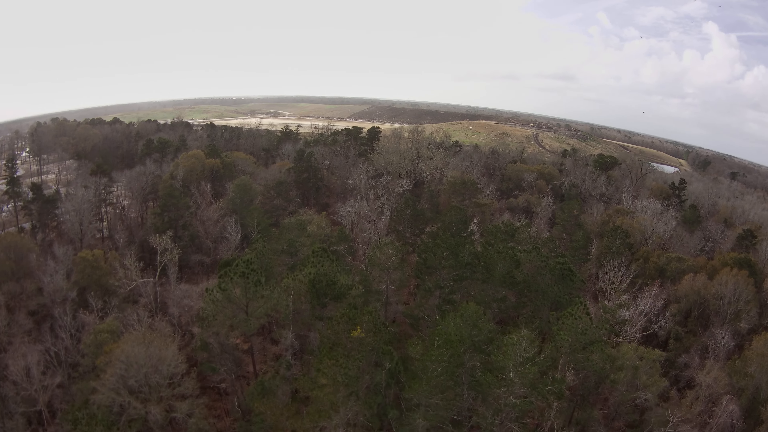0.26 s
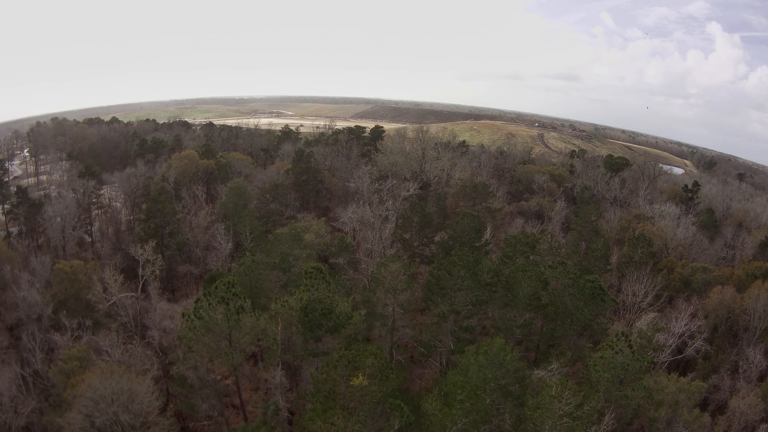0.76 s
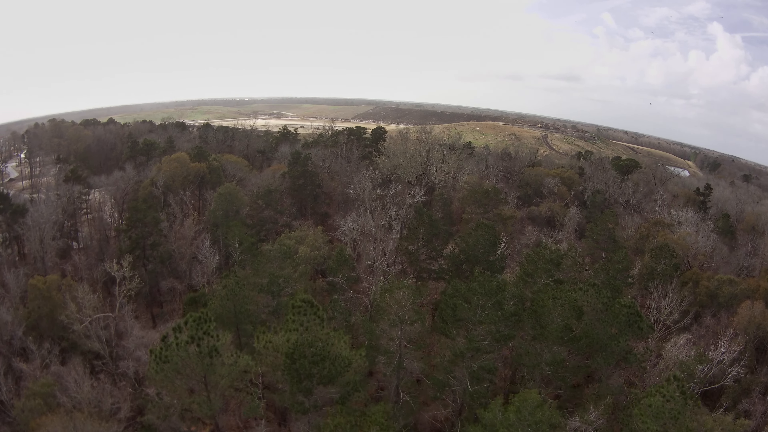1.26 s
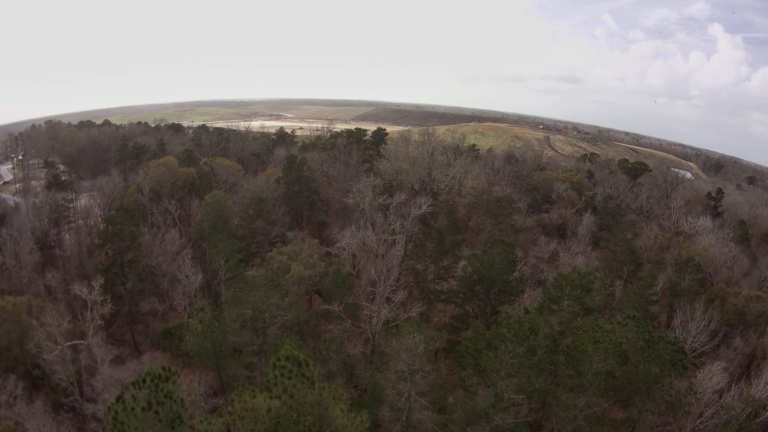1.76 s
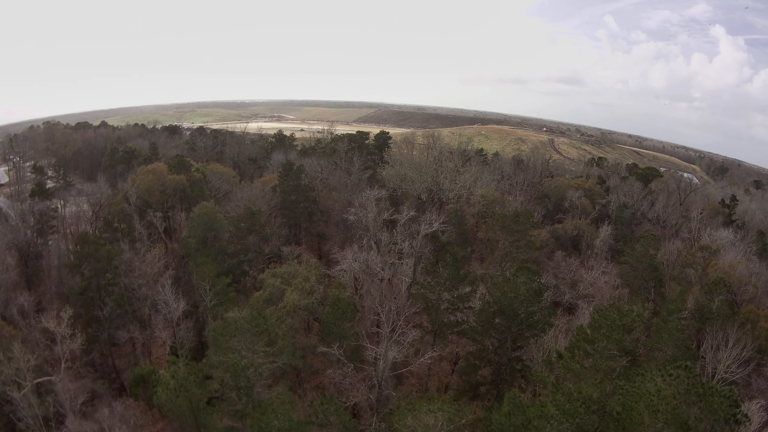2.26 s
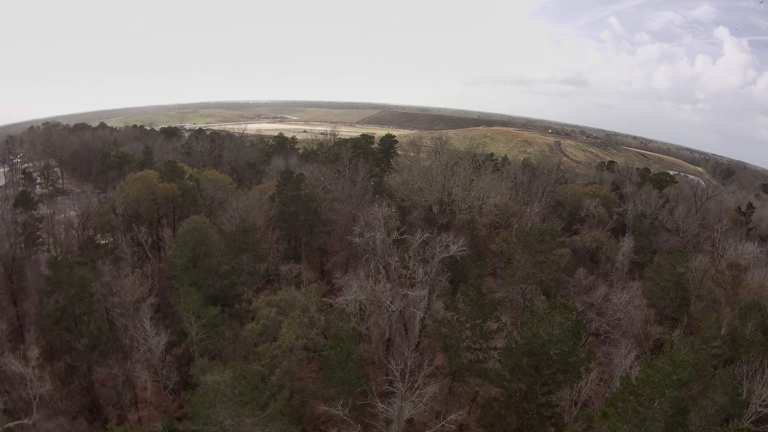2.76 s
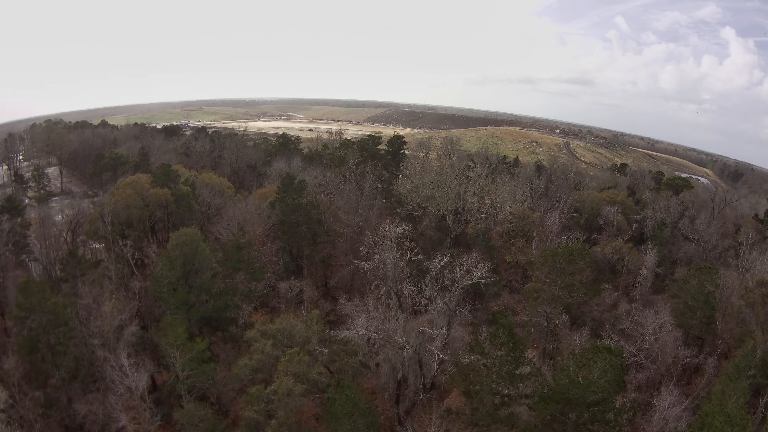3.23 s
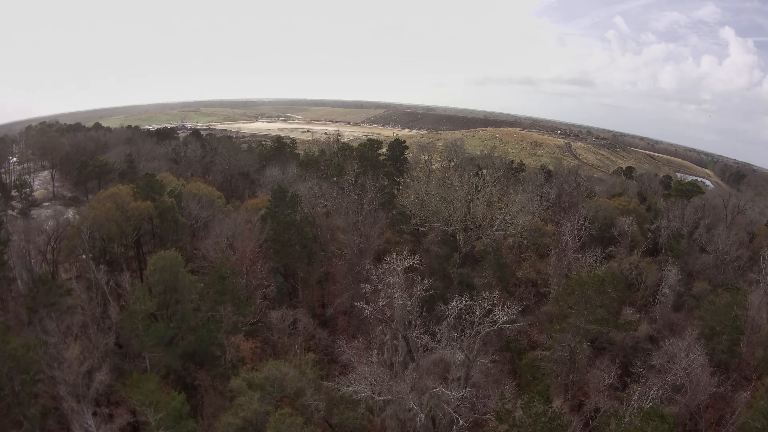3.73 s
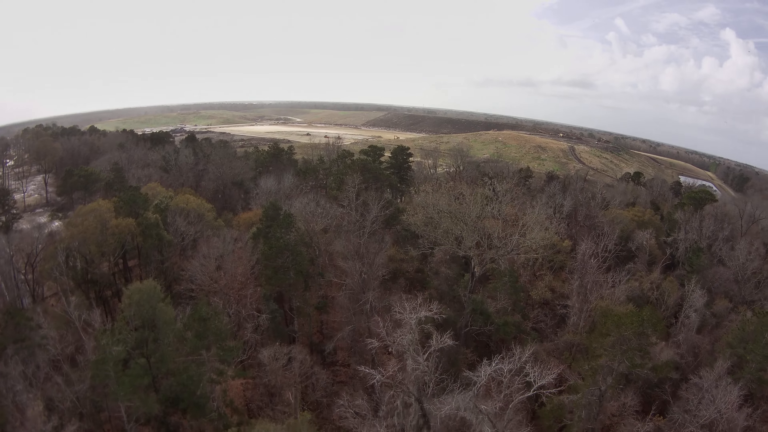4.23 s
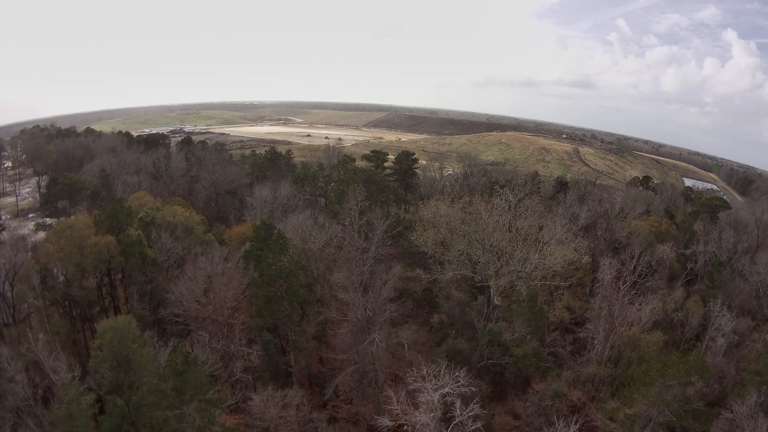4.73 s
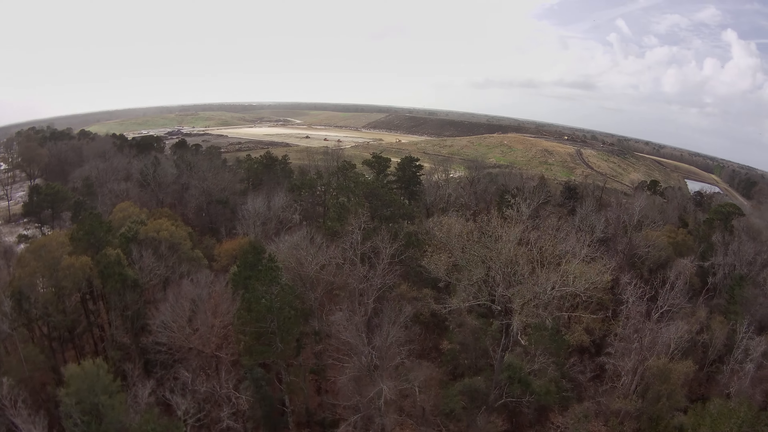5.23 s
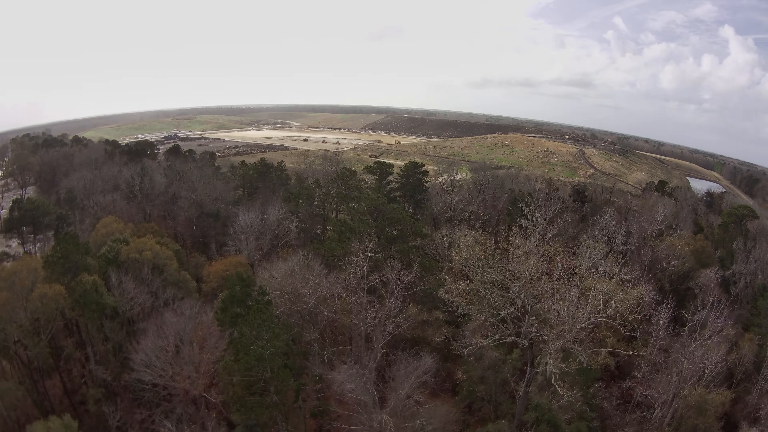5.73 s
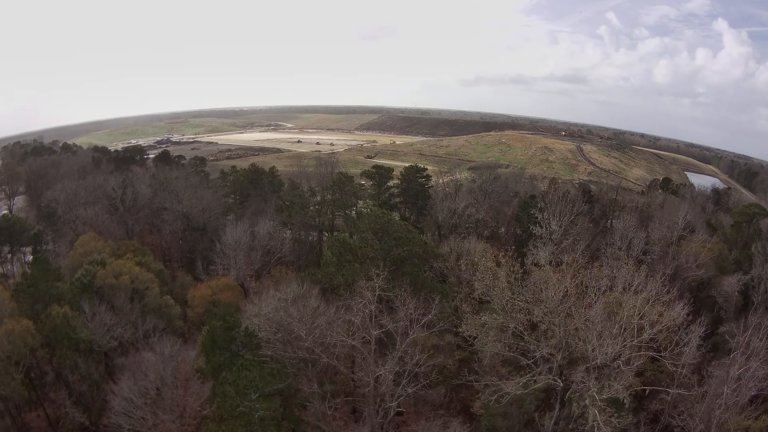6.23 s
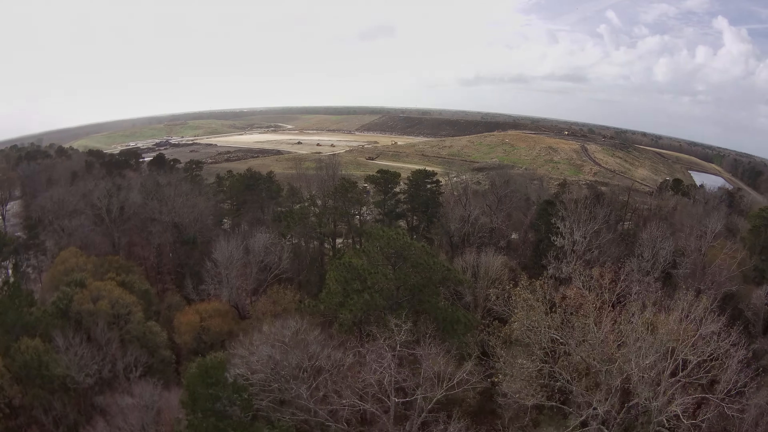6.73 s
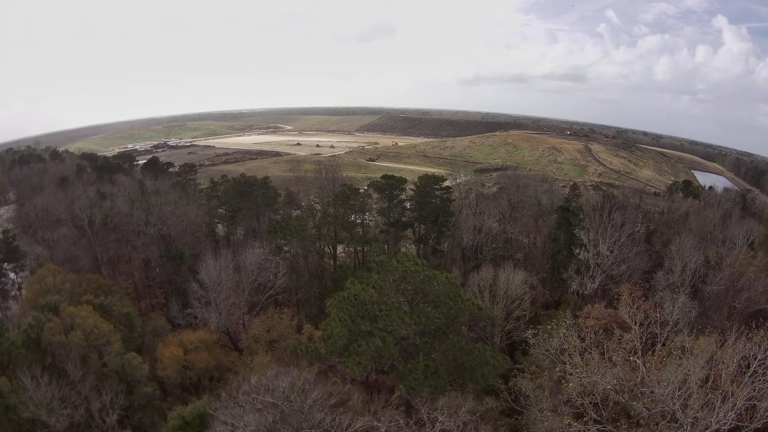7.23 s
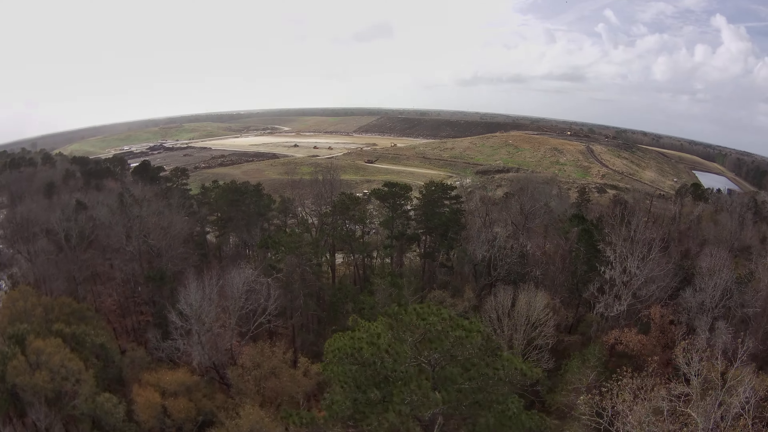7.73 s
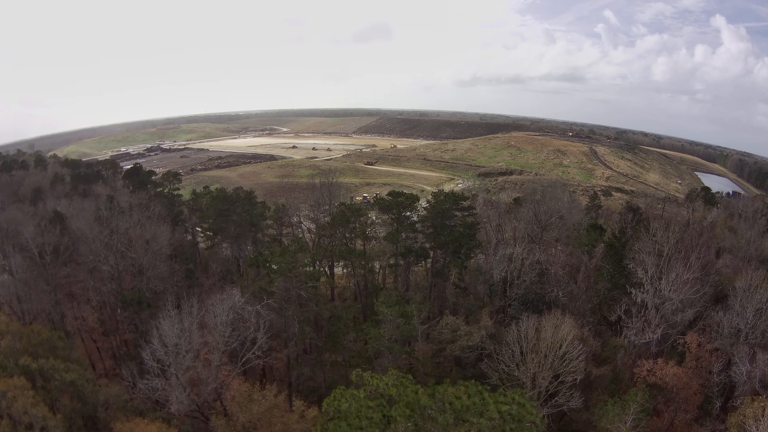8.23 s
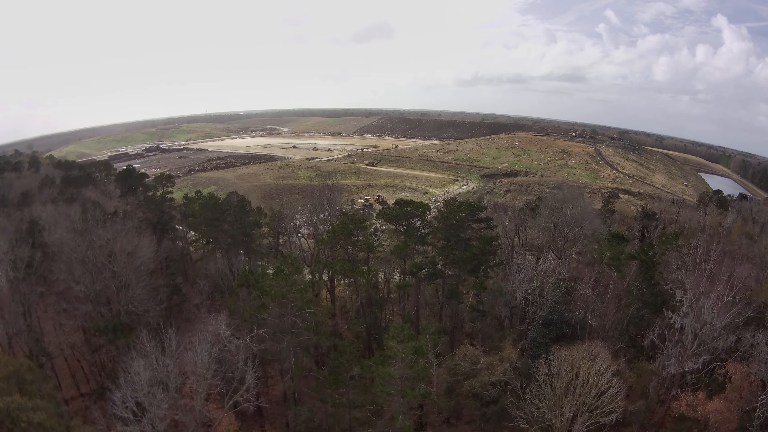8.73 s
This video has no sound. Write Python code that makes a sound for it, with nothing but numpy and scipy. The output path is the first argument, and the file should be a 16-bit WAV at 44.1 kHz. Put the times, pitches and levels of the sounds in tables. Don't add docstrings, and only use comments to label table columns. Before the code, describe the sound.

From 0 s a four-rotor drone is in full flight, heard by a microphone on its body, with no echo. The left channel is loud and slightly overloaded: a throaty near-rotor buzz around 465 Hz with strong overtones, low wind rumble, and airy hiss pulsing with the blades. The right is quieter and more tonal, with several close motor pitches beating, rattling mixed tones and frame buzz. A thin, rough whine sits near 8 kHz. Wind swells from 1.5 s and is strongest around 2.6 s, with short puffs; the pitch jitters constantly. By 4.5 s the wind eases and the near whine is weakest. A quick upward pitch kick comes at about 5.6 s. Near blades grow louder from 6 s; a wind lull falls around 7.1 s, then gusts return by 8 s. The rotors sink to roughly 420 Hz, whine surging, and the drone continues to the cut at 9 s.

```python
import sys
import numpy as np
from scipy import signal
from scipy.fft import rfft, irfft, next_fast_len
from scipy.io import wavfile
from scipy.ndimage import minimum_filter1d

SR = 44100
rng = np.random.default_rng(int(sys.argv[2]) if len(sys.argv) > 2 else 0)


def gain_from_db(level_db):
    decades = np.asarray(level_db, float) / 20
    return 10 ** decades


def transcribe(u):
    v = np.clip(np.atleast_2d(u).T, -1, 1)
    q = np.round(v * 32767).astype(np.int16)
    wavfile.write(sys.argv[1], SR, q)


N = 396018

# (time [s], shaft speed [rev/s])
NEAR_SHAFT = [(0, 233.5), (1.0, 233.7), (2.2, 234.6), (2.7, 237.7), (3.6, 234.5), (3.85, 230.1),
              (5.0, 226.7), (5.4, 224.6), (6.1, 222.6), (6.8, 224.2), (7.1, 219.1), (7.4, 225.4),
              (8.1, 217.9), (8.3, 210.5), (8.98, 210.2)]
SECOND_SHAFT = [(0, 225.4), (.6, 220.5), (1.15, 229), (2, 229.5), (2.72, 234), (3.3, 215), (3.55, 221),
                (4.75, 217), (5, 210.8), (5.4, 220.5), (5.7, 207), (6, 215), (6.5, 214.3), (6.95, 200.5),
                (7.3, 200.9), (7.63, 209.5), (8.75, 196), (8.98, 198.3)]
THIRD_SHAFT = [(0, 259.8), (.6, 258.8), (1.7, 264.2), (2.8, 264.1), (3.02, 256.5), (3.4, 255.6),
               (3.8, 260.3), (4.2, 253.5), (5.4, 251.2), (5.7, 242), (5.95, 247.8), (6.3, 250.2),
               (6.65, 247.8), (7.02, 237.2), (7.65, 245.8), (8.2, 238.5), (8.7, 235), (8.98, 234.4)]
FOURTH_SHAFT = [(0, 262.6), (1.4, 265.2), (2.3, 262.8), (2.8, 265.5), (3.05, 263.4), (3.4, 264.8),
                (3.6, 261.5), (4.2, 257.8), (4.7, 257.3), (5.4, 250.8), (5.75, 252.3), (6.2, 251.2),
                (6.55, 252.8), (7.08, 246.3), (7.63, 251.8), (8.3, 241.2), (8.98, 239.5)]
# (time [s], speed jump [rev/s])
KICKS = [(0.79, 2.4), (1.07, -3.5), (1.29, 3.4), (1.76, -5.6), (2.04, -2.7), (2.13, -3.2), (2.31, -2.9),
         (2.54, -2.3), (2.85, -2.3), (3.25, 3.5), (3.63, 2.8), (3.72, -2.7), (3.94, 3.3), (4.71, 2.3),
         (4.89, 4.7), (5.34, -3.0), (5.64, 9.5), (6.33, 2.6), (8.28, 2.5), (8.63, 3.8)]
# (time [s], near blades [dB], near motor whine [dB], second rotor [dB], frame noise [dB])
LOADS = [
    (0, .5, 2, 0, 0),
    (1.5, .5, -4, -4, .5),
    (3, .5, -1, -.5, .5),
    (4.5, .5, -8, -.5, 0),
    (6, 1.3, -2, -1, 0),
    (7, 2, -1, -3, 0),
    (7.7, 2, -2, -3, 0),
    (8.2, 2, 3, -3, -.5),
    (8.98, 2.3, 3, -3, -.5),
]
# (shaft order [per turn], left level of the four rotors [dB] x 4, right level of the four rotors [dB] x 4)
TONES = [(1, -36, -38, -40, -40, -37, -43, -36, -35), (2, -9.2, -17.6, -39, -41, -21, -25, -29.5, -34.5),
         (3, -40, -47, -50, -50, -30.5, -35, -39, -39), (4, -17, -31, -48, -50, -46, -41, -39, -43),
         (5, -50, -52, -52, -47, -50, -52, -42, -33), (6, -26, -40, -54, -54, -40, -41, -38, -45),
         (8, -33, -46, -56, -56, -56, -52, -53, -54), (10, -42, -52, -58, -58, -52, -50, -54, -52),
         (12, -47, -54, -58, -58, -54, -52, -52, -52), (32, -60, -60, -60, -42, -70, -70, -70, -49),
         (36, -35, -38, -38, -39, -47, -41, -47, -46), (72, -33, -29, -60, -60, -99, -99, -99, -99)]
RIGHT_LAG = [2.1, -0.5, -2, -2.5]
# (time [s], level [dB])
WIND = [
    (0, 0.5),
    (1.5, 0.9),
    (2.6, 1.5),
    (4.5, 0.35),
    (6.5, 0.5),
    (7.1, -2),
    (8, 0.7),
    (8.98, -0.9),
]
# (time [s], level [dB])
GUSTS = [(1.39, 1.5), (1.74, 3.5), (1.9, -2.5), (2.11, 2.5), (2.55, 2), (2.65, -0.5), (2.84, 0), (4.27, 2),
         (4.65, -0.9), (5.24, 0.9), (5.45, 1.5), (6.32, -2), (6.94, 1.8), (7.35, 1.8), (7.59, 0.5),
         (7.95, -2)]
# (frequency [Hz], density [dB per Hz])
RUMBLE = [(18, -90), (30, -97), (47, -56), (94, -45), (130, -39.5), (200, -41), (300, -45.5), (500, -49),
          (750, -51), (1200, -56), (2500, -67.5)]
HISS = [(500, -66.5), (1500, -55.5), (2400, -60.5), (4000, -62), (6000, -60.5), (7000, -67.5), (9500, -65),
        (12000, -62.5), (14200, -52), (15500, -53.5)]
FRAME = [(60, -83), (180, -73), (350, -68), (700, -59), (850, -64), (1100, -62), (1400, -54), (1900, -64),
         (2300, -61), (3600, -62), (4400, -70), (6000, -67.5), (7800, -68), (8600, -78)]
MIXES = [(2, 0, 2, 0), (2, 0, 0, 1), (0, 2, 0, 3), (2, 0, 1, 0), (0, 2, 0, 1), (2, 0, 4, 0), (0, 2, 2, 0),
         (0, 4, 0, 2), (0, 4, 2, 0), (3, 0, 2, 0)]
MIX_DB = [-43, -39, -36.5, -39, -39, -34, -43, -38, -38, -45]
# (frequency [Hz], left floor [dB per Hz], right floor [dB per Hz])
DROP_UNDER = [(1500, -70, -72), (2200, -63.5, -64.5), (3300, -64, -64.5), (4100, -66.5, -67),
              (4400, -67.5, -70.5), (5200, -68, -68.5), (6000, -68, -73), (6800, -67.5, -64.5),
              (7200, -68.5, -70), (8000, -69, -70), (8700, -71, -73), (9700, -71, -73), (10000, -71, -65),
              (14900, -66, -65), (15100, -57, -65), (15400, -54.5, -65)]
# (low edge [Hz], high edge [Hz])
JOINT_HZ = (1750, 4150)


def rotor_tones(angles, near_db, whine_db, second_db, wobble_db):
    sway_db_per_order = 0.2973
    right_fade_db, far_whine_fade_db = 2.2, 6
    crack_db = -41
    out = np.zeros((2, N))
    far_db = far_whine_fade_db * np.linspace(.5, -.5, N)
    blade_loads_db = [near_db, second_db, 0, 0]
    for k, angle in enumerate(angles):
        sway_db = sway_db_per_order * drift(4.8)
        right_angle = angle - np.float32(RIGHT_LAG[k] / 2)
        for order, *db in TONES:
            if order < 30:
                load_db, rasp_db = blade_loads_db[k], 0
            else:
                load_db = [whine_db * (order == 36), 0, far_db, far_db][k]
                rasp_db = 3.5 * drift(200)
            moving_db = load_db + rasp_db + wobble_db * drift(22) + min(order, 6) * sway_db
            peak = np.sqrt(2) * gain_from_db(np.float32(moving_db))
            out[0] -= gain_from_db(db[k]) * peak * np.sin(order * angle)
            out[1] -= gain_from_db(db[4 + k]) * peak * np.sin(order * right_angle)
    out[1] *= gain_from_db(-right_fade_db * np.linspace(0, 1, N) ** 2)
    crack = sum(np.sin(order * angles[0]) for order in range(14, 35, 2))
    out[0] -= np.sqrt(2) * gain_from_db(crack_db + 1.5 * drift(30)) * crack
    return out


def shaft_angles(hunts, shake):
    near = in_time(NEAR_SHAFT) + kicks()
    speeds = np.vstack([near, in_time(SECOND_SHAFT), in_time(THIRD_SHAFT), in_time(FOURTH_SHAFT)])
    speeds = speeds * [1 + hunt * drift(12.07) + shake * drift(63.3) for hunt in hunts]
    turns = np.cumsum(speeds, axis=1) / SR + rng.random((4, 1))
    return (2 * np.pi * (turns % 1)).astype(np.float32)


def kicks():
    rise_s, settle_s = .03, .1
    s, revs = np.transpose(KICKS)
    after = np.maximum(np.arange(0, N + 40, 40) / SR - s[:, None], 0)
    shape = np.exp(-after / settle_s) - np.exp(-after / rise_s)
    return np.interp(np.arange(N) / 40, np.arange(after.shape[1]), revs @ shape / shape.max())


def downwash(angles, rumble_db, hiss_db, burst_db, sharp):
    second_wake_db = 3
    near_wake, second_wake = np.exp(sharp * (np.cos(2 * angles[:2]) - 1))
    flutter_db = 0.4 * drift(6) + 1.23 * drift(22) + 2.0 * drift(360)
    hiss = colour(turbulence(burst_db * near_wake + second_wake_db * second_wake + flutter_db), HISS)
    rumble = colour(turbulence(0.58 * drift(8.0)), RUMBLE)
    return gain_from_db(rumble_db) * rumble + gain_from_db(hiss_db) * hiss


def airstream():
    spread_s = .04
    t = np.arange(N) / SR
    puffs_db = sum(db * np.exp(-.5 * ((t - s) / spread_s) ** 2) for s, db in GUSTS)
    return in_time(WIND)[0] + puffs_db


def mixing_tones(angles, wobble_db):
    out = np.zeros(N)
    for mix, db in zip(MIXES, MIX_DB):
        level = np.sqrt(2) * gain_from_db(db + wobble_db * drift(10.5))
        out += level * np.sin(np.float32(mix) @ angles)
    return out


def frame_noise(db):
    housing_hz, housing_db = (5320, 6260), 6.5
    buzz = gain_from_db(db) * colour(turbulence(0.44 * drift(11)), FRAME)
    housing = signal.sosfilt(signal.butter(2, housing_hz, "band", fs=SR, output="sos"), buzz)
    return np.array([-gain_from_db(housing_db) * housing, buzz])


def turbulence(db):
    x = rng.standard_normal(N) * gain_from_db(db)
    return x / x.std()


def colour(x, spectrum):
    size = next_fast_len(N)
    hz, db = np.transpose(spectrum)
    bins_hz = np.fft.rfftfreq(size, 1 / SR)
    gain = gain_from_db(np.interp(np.log(bins_hz + 1), np.log(hz), db)) * np.sqrt(SR / 2)
    return irfft(rfft(x, size) * gain, size)[:N]


def drift(per_s):
    r = np.exp(-40 * np.pi * per_s / SR)
    slow = signal.lfilter([1], [1, -2 * r, r * r], rng.standard_normal(N // 20 + 4002))[4000:]
    return np.interp(np.arange(N) / 20, np.arange(len(slow)), slow / slow.std()).astype(np.float32)


def in_time(rows):
    s, *columns = np.transpose(rows)
    return np.array([np.interp(np.arange(N) / SR, s, c) for c in columns])


def scene():
    wind_db = airstream()
    slowing_db = np.linspace(-.5, .5, N)
    rumble_db = 0.51 * wind_db + slowing_db + 1.6 * drift(3.1)
    near_db, whine_db, second_db, frame_db = in_time(LOADS)
    angles = shaft_angles(hunts=(.0042, .003, .003, .003), shake=.0022)
    tones = rotor_tones(angles, near_db, whine_db, second_db, wobble_db=1.0)
    left, right = tones + frame_noise(frame_db)
    left = left + downwash(angles, rumble_db, wind_db, burst_db=6, sharp=2.3)
    return np.array([left, right + mixing_tones(angles, wobble_db=3.2)])


def sum_and_difference(pair):
    return np.array([pair[0] + pair[1], pair[0] - pair[1]]) / np.sqrt(2)


def band_thinning(x, mask_db, chance_db, size=2048, count=8):
    hz, s, cells = signal.stft(x, SR, "cosine", size, scaling="psd")
    joint = (hz >= JOINT_HZ[0]) & (hz < JOINT_HZ[1])
    cells[:, joint] = sum_and_difference(cells[:, joint])
    starts = np.arange(0, len(hz), count)
    power = 2 * np.add.reduceat(abs(cells) ** 2, starts, axis=1) / count
    level_db = 10 * np.log10(power + 1e-20)
    loud_near_db = -minimum_filter1d(-level_db, size=5, axis=1)
    at, *floors = np.transpose(DROP_UNDER)
    floor_db = np.array([np.interp(hz[starts], at, db, left=-150) for db in floors])[:, :, None]
    masked = (level_db < loud_near_db - mask_db) & (hz[starts] > 2000)[:, None]
    heard = level_db + chance_db * rng.standard_normal(level_db.shape) > floor_db
    keep = np.repeat(heard & ~masked, count, axis=1)[:, :len(hz)]
    cells = cells * keep * (hz < 15520)[:, None]
    cells[:, joint] = sum_and_difference(cells[:, joint])
    return signal.istft(cells, SR, "cosine", size, scaling="psd")[1][:, :N]


def band_limit(x):
    return signal.sosfilt(signal.butter(12, 16680, fs=SR, output="sos"), x)


def record(dry):
    knee, top = 5.0, 1.01
    rounded = dry / (1 + abs(dry / top) ** knee) ** (1 / knee)
    coupled = signal.sosfilt(signal.butter(2, 40, "high", fs=SR, output="sos"), rounded)
    thinned = band_thinning(coupled, mask_db=11.5, chance_db=1.2)
    return band_limit(np.clip(thinned, -1, 1))


dry = scene()
out = record(dry)
transcribe(out)
```